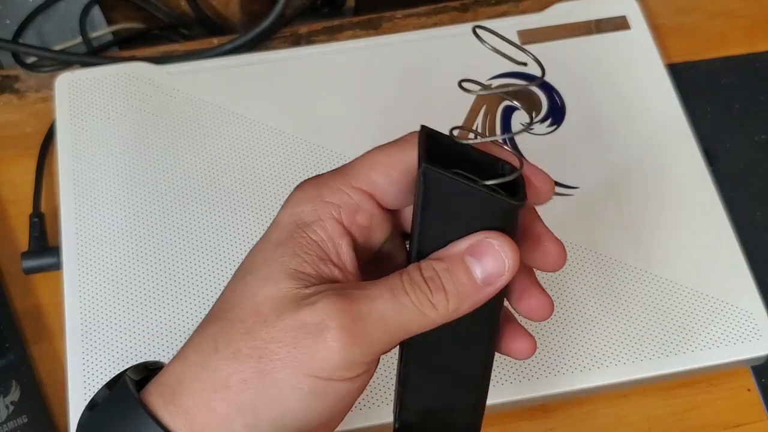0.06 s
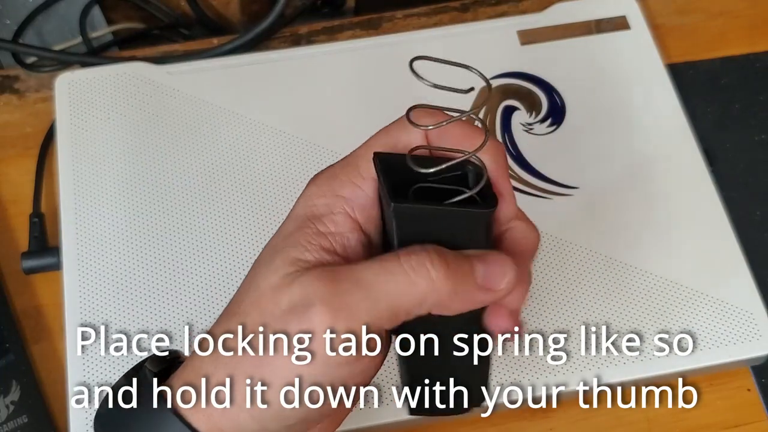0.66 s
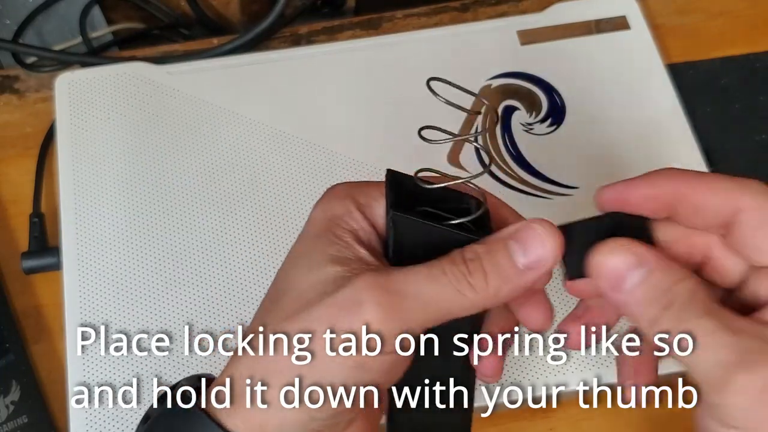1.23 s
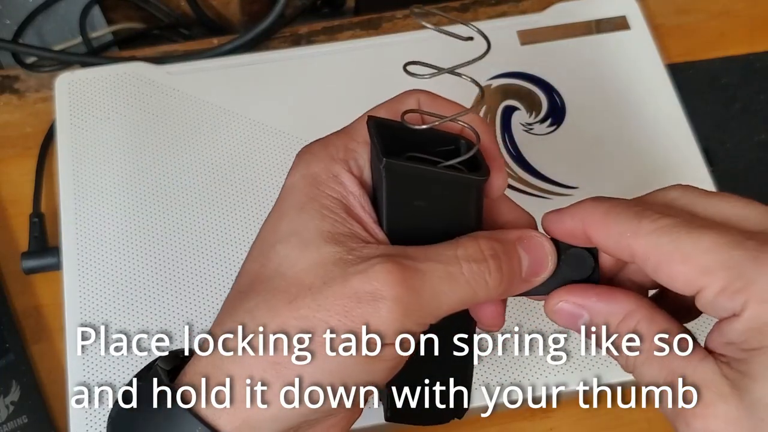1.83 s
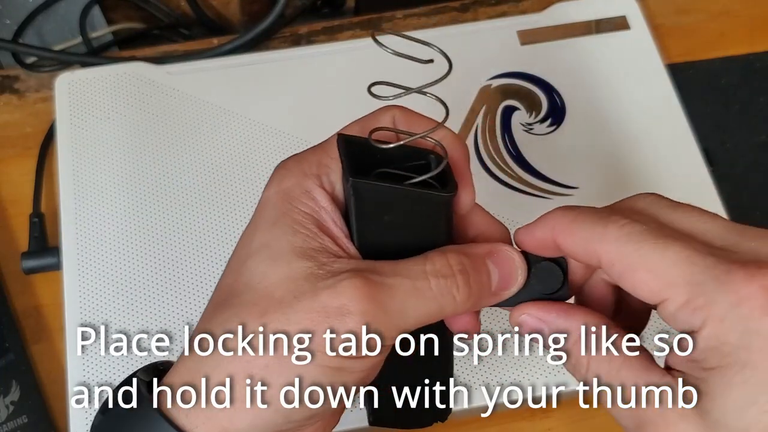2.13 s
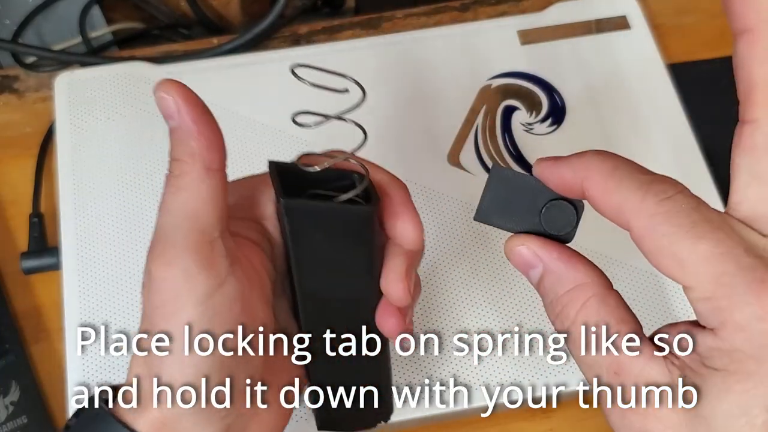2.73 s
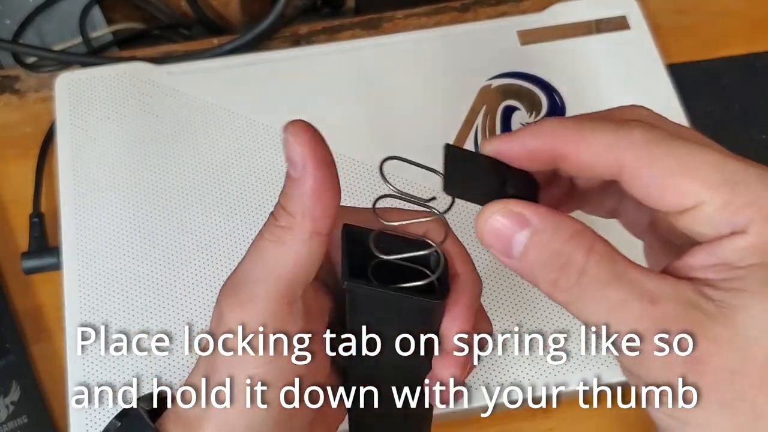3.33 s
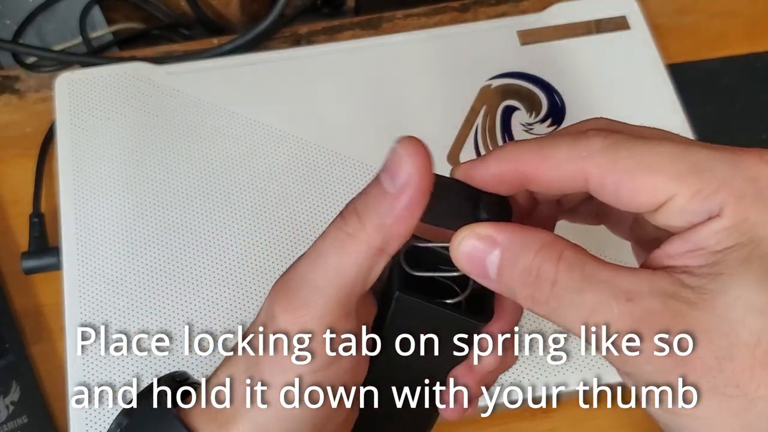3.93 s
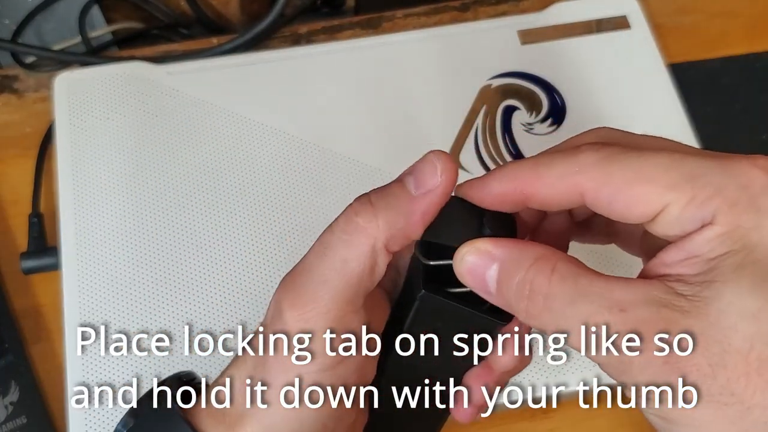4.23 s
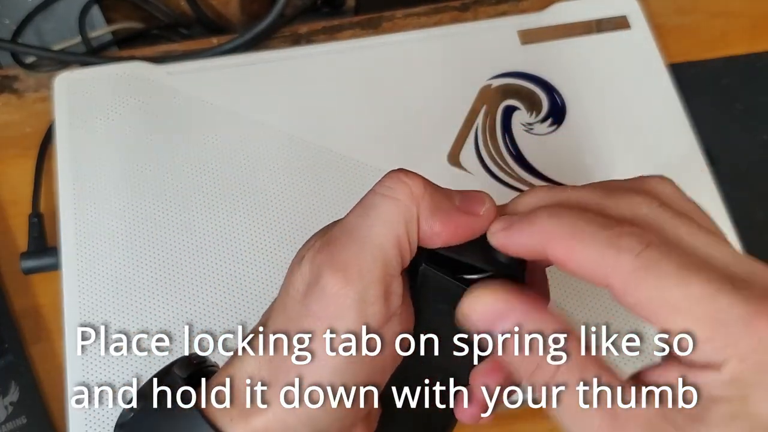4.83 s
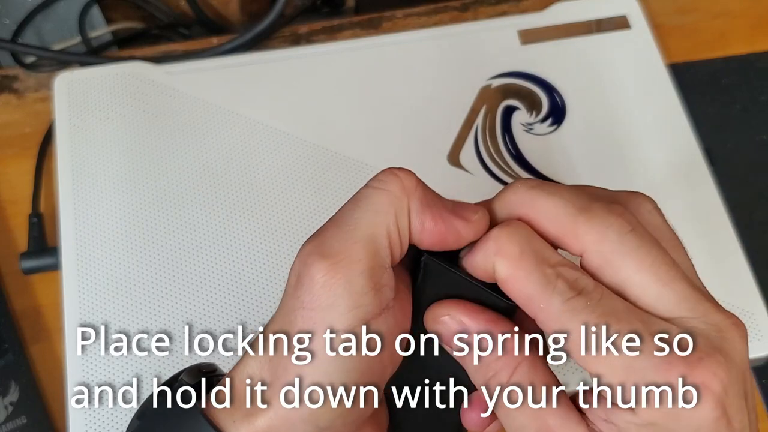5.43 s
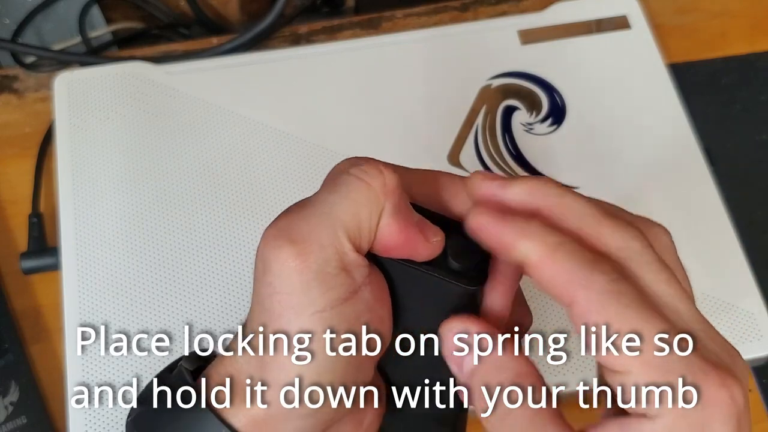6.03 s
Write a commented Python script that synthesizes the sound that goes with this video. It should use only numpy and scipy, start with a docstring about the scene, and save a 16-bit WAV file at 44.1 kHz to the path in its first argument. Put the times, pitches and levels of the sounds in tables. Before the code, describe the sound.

A steady low motor hum indoors, then metal parts click, scrape and snap as a tab is pressed onto a magazine spring.

```python
"""A motor and small fans hum steadily in a small room, and fingers brush a metal tube near the microphone.
A locking tab is set on a magazine spring and pressed down into the tube. It ticks against the wire,
scrapes by stick-slip friction, then snaps in at the mouth of the tube, whose modes ring briefly.
Gain control sags a little after the hardest snap."""
import sys
import numpy as np
from scipy import signal
from scipy.fft import rfft, irfft
from scipy.io import wavfile
from scipy.ndimage import uniform_filter1d

SR = 44100
rng = np.random.default_rng(int(sys.argv[2]) if len(sys.argv) > 2 else 0)


def int16_out(signal):
    """Quantize to a 16-bit WAV file."""
    q = np.round(np.clip(np.atleast_2d(signal).T, -1, 1) * 32767)
    wavfile.write(sys.argv[1], SR, q.astype(np.int16))


N = 268128
T = np.arange(N) / SR


def amp(db):
    """Decibel law: 20 dB is a factor of ten in amplitude."""
    return 10 ** (np.asarray(db) / 20)


def unit_rms(x):
    """Normalisation to a mean power of 1."""
    return x / np.sqrt(np.mean(x ** 2) + 1e-20)


def curve_at(points, hz):
    """Linear interpolation on a log-frequency axis."""
    f, value = np.transpose(points)
    return np.interp(np.log(hz + 1), np.log(f + 1), value)


def drift(rate_hz, count=200):
    """Random modulation: low-pass noise of rms about 1."""
    hz = np.fft.rfftfreq(count, T[-1] / count)
    slow = irfft(rfft(rng.standard_normal(count)) / (1 + (hz / rate_hz) ** 4), count)
    return np.interp(T, np.linspace(0, T[-1], count), unit_rms(slow))


def colour(x, spectrum, tilt_db=0, peak_hz=3000, lift_db=0, relative_width=0.21, size=2048):
    """Minimum-phase filter of unit energy: a spectrum, a tilt per octave and one resonance."""
    hz = abs(np.fft.fftfreq(size, 1 / SR))
    db = curve_at(spectrum, hz) + tilt_db * np.log2(np.maximum(hz, 800) / 3000)
    db += lift_db / (1 + (2 * (hz / peak_hz - 1) / relative_width) ** 2)
    log_response = np.conj(signal.hilbert(np.log(amp(db))))
    taps = np.fft.ifft(np.exp(log_response)).real
    return signal.fftconvolve(x, taps[None] / np.linalg.norm(taps), axes=1)[:, :x.shape[1]]


def tone(turns, hz, db, balance_db, left_delay_s=0.000044):
    """Standing waves set a tone's level at each microphone port; it reaches the left one later."""
    sides = amp([[balance_db / 2], [-balance_db / 2]])
    lag = hz * left_delay_s * np.array([[1], [0]])
    return amp(db) * np.sqrt(2) * unit_rms(sides) * np.sin(2 * np.pi * (turns + rng.random() - lag))


# motor harmonics: (multiple of shaft speed, level [dB], left minus right [dB])
MOTOR_HARMONICS = [(1, -17.7, -.4), (2, -35.8, -1), (3, -50, -12), (4, -51, 9), (5, -60, 1), (8, -53, 4),
                   (10, -60, 6), (11, -59, -7), (13, -51, 10), (14, -59, 5), (15, -60, -10), (17, -64, 1),
                   (32, -67, 7), (33, -67, -12), (40, -68, -10), (48, -65, -4), (49, -59, 0), (50, -68, -4),
                   (57, -70, -4)]


def motor(shaft_hz=57.755, slip_turns=0.0064):
    """Harmonic series: every partial is phase-locked to one nearly steady shaft."""
    shaft = shaft_hz * T + slip_turns * drift(rate_hz=1)
    return sum(tone(k * shaft, k * shaft_hz, db, balance) for k, db, balance in MOTOR_HARMONICS)


# fan tones: (frequency [Hz], level [dB], left minus right [dB])
FAN_TONES = [(67.1, -45, -2), (73.7, -43, 0), (82, -41, -2), (84.7, -54, -2), (93.1, -45, -1),
             (98.1, -50, 3), (134.6, -41.5, -2), (144.3, -50, 2), (259.9, -61, 7), (312.9, -60, -3),
             (336.8, -52, -1), (404.3, -56, 3), (493.2, -57, 1), (624.1, -59, 2), (626.3, -55.5, 0),
             (1010.5, -65, -2), (1347.5, -61, 1), (1684.3, -57.5, -16), (2010, -60.5, -11)]


def fans(waver_turns=0.013, waver_hz=2.5):
    """Phase modulation: each fan tone wavers independently."""
    return sum(tone(hz * T + waver_turns * drift(waver_hz), hz, db, balance)
               for hz, db, balance in FAN_TONES)


# rush of the fans: (frequency [Hz], relative spectral density [dB])
AIR_SPECTRUM = [(20, -71.5), (85, -65), (130, -64.5), (210, -76), (350, -70), (480, -78.5), (900, -77.5),
                (1500, -78.5), (3000, -84.5), (4500, -90.5), (6200, -94), (7800, -102), (11500, -103),
                (15500, -98.5)]
# fan housing resonances: (frequency [Hz], bandwidth [Hz], lift [dB])
HOUSING_RESONANCES = [(484.6, 60, 10), (603, 54, -5.5), (639, 114, 10.5), (2870, 200, 0.5), (4145, 300, 9),
                      (6000, 104, 7.5)]
# likeness of left and right in the rush: (frequency [Hz], correlation)
AIR_CORRELATION = [(60, 1), (130, 0.31), (290, 0.91), (640, 0.22), (1400, -0.48), (3000, 0.089),
                   (15000, -0.15)]


def air(level_db=-36.5):
    """Turbulence noise filtered by the fan housings: coherent in the bass, more diffuse above."""
    hz = np.fft.rfftfreq(N, 1 / SR)
    left, independent = rfft(rng.standard_normal((2, N)))
    correlation = curve_at(AIR_CORRELATION, hz)
    right = correlation * left + np.sqrt(1 - correlation ** 2) * independent
    housing_db = sum(lift / (1 + (2 * (hz - f) / width) ** 2) for f, width, lift in HOUSING_RESONANCES)
    rush = irfft(np.array([left, right]) * amp(curve_at(AIR_SPECTRUM, hz) + housing_db), N)
    return amp(level_db) * unit_rms(rush)


# reverberation time of the room: (frequency [Hz], T60 [s])
ROOM_T60 = [(500, 0.12), (2000, 0.17), (5000, 0.15), (9000, 0.13), (15000, 0.079)]


def room(x, first_echo_s=0.002, size=256):
    """Reverberation: dense reflections from desk and walls decay exponentially, the top treble first."""
    hz, t, noise = signal.stft(rng.standard_normal((2, SR // 2)), SR, nperseg=size)
    decay = amp(-60 * t / curve_at(ROOM_T60, hz)[:, None])
    tail = signal.istft(noise * decay, SR, nperseg=size)[1]
    tail *= np.clip(np.arange(tail.shape[1]) / SR / first_echo_s - 1, 0, 1)
    return signal.fftconvolve(x, tail / np.linalg.norm(tail, axis=1, keepdims=True), axes=1)[:, :N]


def at_ports(direct, scattered, direct_share=0.4):
    """Path difference: the hands are nearer the left port; scattered sound differs between the ports."""
    late = np.pad(direct, (2, 0))[:len(direct)]
    return np.sqrt(direct_share) * np.array([direct, late]) + np.sqrt(1 - direct_share) * scattered


def strokes(rows, swell_s, fade_s):
    """Exponential envelopes: each rub swells up to its moment and dies away."""
    return sum(amp(db) * np.exp(-np.maximum((s - T) / swell_s, (T - s) / fade_s)) for s, db in rows)


def friction(slips_per_s=2500):
    """Shot noise: one surface slips over another in tiny random impulses."""
    slips = rng.standard_normal((3, N)) * (rng.random(N) < slips_per_s / SR)
    return at_ports(slips[0], slips[1:])


# response of the tube to any contact: (frequency [Hz], relative level [dB])
TUBE_SPECTRUM = [(300, -49), (650, -14), (900, 0.5), (1250, -5), (1600, 4), (1850, -6), (2150, 6.5),
                 (2600, -5.5), (3400, 1), (4200, -7.5), (5000, -4), (6100, -0.5), (8000, -7.5),
                 (15500, -10.5)]
# brushes as the grip changes: (time [s], level [dB])
FINGER_BRUSHES = [(.125, -51), (.47, -56), (.62, -57), (.81, -54)]


def fingers():
    """Sliding friction: skin on the tube makes a faint, bright hiss."""
    hiss = unit_rms(colour(friction(), TUBE_SPECTRUM, tilt_db=1.5))
    return strokes(FINGER_BRUSHES, swell_s=0.047, fade_s=0.06) * hiss


# slips of the squeezed spring: (time [s], level of the coil's note [dB])
SPRING_SLIPS = [(4.06, -41), (4.2, -44), (4.33, -47), (4.52, -44), (4.62, -48), (4.715, -39), (4.77, -40),
                (5.255, -37), (5.45, -32), (5.72, -41), (5.95, -38)]
# scrapes of the tab along the tube, growing until it catches: (time of the catch [s], level [dB])
TAB_SCRAPES = [(5.73, -29), (5.917, -30.5)]


def metal_rub(start_hz=1005, width_hz=32, press_s=4.68, sink_hz_per_s=142, slip_rasp_db=-14):
    """Stick-slip friction rasps and drives a coil resonance, which sinks once the thumb bears down."""
    slipping = strokes(SPRING_SLIPS, swell_s=0.01, fade_s=0.046)
    scraping = strokes(TAB_SCRAPES, swell_s=0.018, fade_s=0.014)
    drive = friction()
    coil_hz = start_hz - sink_hz_per_s * np.maximum(T - press_s, 0)
    carrier = np.exp(2j * np.pi * np.cumsum(coil_hz) / SR)
    pole = np.exp(-np.pi * width_hz / SR)
    coil = (carrier * signal.lfilter([1 - pole], [1, -pole], drive / carrier)).real  # gliding band-pass
    rasp = unit_rms(colour(drive, TUBE_SPECTRUM))
    return slipping * unit_rms(coil) + (scraping + amp(slip_rasp_db) * slipping) * rasp


def chatter(force, spread_db=4.0):
    """Broadband excitation: tiny uneven impacts, whitened so that the metal alone gives the colour."""
    n = len(force)
    grains = rng.standard_normal((3, n)) * amp(spread_db * rng.standard_normal(n)) * force
    spectrum = rfft(at_ports(grains[0], grains[1:]), 2 * n)
    smooth_power = uniform_filter1d((abs(spectrum) ** 2).mean(0), size=250)
    white = irfft(spectrum / np.sqrt(smooth_power + 1e-12))[:, :n]
    return unit_rms(white) * np.sqrt(np.mean(force ** 2))


def impacts(rows, spectrum, modes, ring_db, rise_share=0.076, scatter_turns=0.062):
    """Modal response: a dying chatter excites the hand-damped metal, which then rings freely."""
    out, t = np.zeros((2, N)), np.arange(SR // 4) / SR
    hz, mode_db, t60 = np.transpose(modes)[:, :, None]
    for s, db, tilt_db, chatter_s, ring_offset_db, peak_hz, lift_db in rows:
        age = t / chatter_s
        force = (1 - np.exp(-age / rise_share)) * np.exp(-age)  # longer contacts start more softly
        crack = colour(chatter(force), spectrum, tilt_db, peak_hz, lift_db)
        # each port hears a mode at its own phase
        phase = rng.random(hz.shape) + scatter_turns * rng.standard_normal((2, len(hz), 1))
        envelopes = amp(mode_db + tilt_db * np.log2(hz / 3000) - 60 * t / t60)
        ring = (envelopes * np.sin(2 * np.pi * (hz * t + phase))).sum(1)
        build_up = np.cumsum(force ** 2) / np.sum(force ** 2)  # the ring grows while the contact lasts
        click = amp(db) * (crack + amp(ring_db + ring_offset_db) * build_up * ring)
        start = round(s * SR)
        out[:, start:start + len(t)] += click[:, :N - start]
    return out


# response of the tab and spring to a contact: (frequency [Hz], relative level [dB])
TAB_SPECTRUM = [(300, -26), (750, -16), (1120, 0.5), (1450, -6.5), (2300, -0.5), (3200, -3), (3800, -1.5),
                (4900, -8.5), (5900, -9), (7100, -7), (8100, -17.5), (10500, -12.5), (15500, -16)]
# modes of the tab on its spring: (frequency [Hz], relative level [dB], T60 [s])
TAB_RESONANCES = [(1017, -8, .2), (1136, -8, .1), (1640, -9, .07), (2099, -11, .09), (2410, -5, .12),
                  (2900, -12, .07), (3660, -3, .06), (3760, 1, .13), (4470, -4, .07), (4750, -7, .05),
                  (5200, 1, .06), (7052, -11, .08)]
# knocks on the spring: (time [s], level [dB], tilt [dB/octave], chatter time [s], ring offset [dB],
# resonance favoured by the point of contact [Hz], its lift [dB])
TAB_KNOCKS = [(3.5357, -31.5, 0.5, 0.0056, -14, 6870, 13), (3.6342, -20.5, 1.5, .007, 1, 3620, 0),
              (4.0275, -15.5, 2.5, 0.0036, -7, 1200, 9), (4.0302, -7, 1, 0.0037, -2, 4870, 8.5),
              (4.5025, -34, -5, .0034, -10, 5250, 18), (4.5688, -9, 0.5, 0.0043, -7, 4720, 10.5),
              (4.6345, -20.5, -5, 0.0025, -13, 6000, 8), (4.838, -33, -4, 0.0036, -14, 7200, 6),
              (4.9225, -30, -2.5, 0.0046, -12, 3520, 5), (5.0268, -32.5, -4.5, 0.0054, -12, 2000, 5)]


def tab_ticks():
    """Impact excitation: the tab knocks on the spring wire and the two ring together."""
    return impacts(TAB_KNOCKS, TAB_SPECTRUM, TAB_RESONANCES, ring_db=-16.5)


# modes of the tube: (frequency [Hz], relative level [dB], T60 [s])
TUBE_RESONANCES = [(885, -2, .15), (1620, -5, .07), (2094, -1, .22), (2218, -5, .17), (2918, -9, .09),
                   (3402, -3, .055), (4990, -4, .05), (5981, -5, .05)]
# catches in the mouth of the tube: (time [s], level [dB], tilt [dB/octave], chatter time [s],
# ring offset [dB], resonance favoured by the point of contact [Hz], its lift [dB])
TUBE_CATCHES = [(5.2477, -9, 1, 0.0035, -5.5, 3320, 4.9), (5.4217, -19, 0, 0.0052, -8, 3700, 3),
                (5.4264, 0, 1.5, .0038, -10, 4930, 6), (5.4308, 0, 6, .004, -13, 3860, 7.5),
                (5.444, -15, -2, 0.011, -4, 2260, 7), (5.462, -24, 3, 0.0064, -17, 6400, 6),
                (5.7035, -13.5, -1, 0.0049, -10, 3280, 4.6), (5.727, -16.5, -2, 0.0027, -18, 3200, 9.1),
                (5.828, -30, -6, 0.01, -6, 3450, 11), (5.9172, -16, -4.5, .007, -4, 2100, 8.1),
                (5.9208, -19, 0, 0.0057, -2, 5000, 13), (5.955, -22.5, -3.5, .004, -23, 1530, 4)]


def tube_snaps():
    """Damped free vibration: the tab snaps in and the tube rings in its inharmonic modes."""
    return impacts(TUBE_CATCHES, TUBE_SPECTRUM, TUBE_RESONANCES, ring_db=-12.5)


def scene(room_db=-7):
    """Superposition: the handled parts and their reverberation over the hum and the rush of air."""
    parts = tab_ticks() + tube_snaps() + metal_rub() + fingers()
    return parts + amp(room_db) * room(parts) + motor() + fans() + air()


def peak_hold(db, fall_db_per_s):
    """Peak detection: follows a level up at once and lets it fall at a steady rate."""
    return np.maximum.accumulate(db + T * fall_db_per_s) - T * fall_db_per_s


def record(dry, threshold_db=-13, quick_share=0.47, slow_share=0.15, cutoff_hz=15950):
    """Compression, then a low-pass: gain dips at the hardest snaps and recovers part fast, part slowly."""
    power = uniform_filter1d((dry ** 2).mean(0), size=380)
    over_db = np.maximum(10 * np.log10(abs(power) + 1e-12) - threshold_db, 0)
    cut_db = quick_share * peak_hold(over_db, fall_db_per_s=150)
    cut_db += slow_share * peak_hold(over_db, fall_db_per_s=0.5)
    ducked = dry / amp(uniform_filter1d(cut_db, size=200))
    low_pass = signal.cheby1(12, 0.05, cutoff_hz, fs=SR, output="sos")
    return signal.sosfiltfilt(low_pass, ducked * signal.windows.tukey(N, 0.002))


dry = scene()
out = record(dry)
int16_out(out)
```